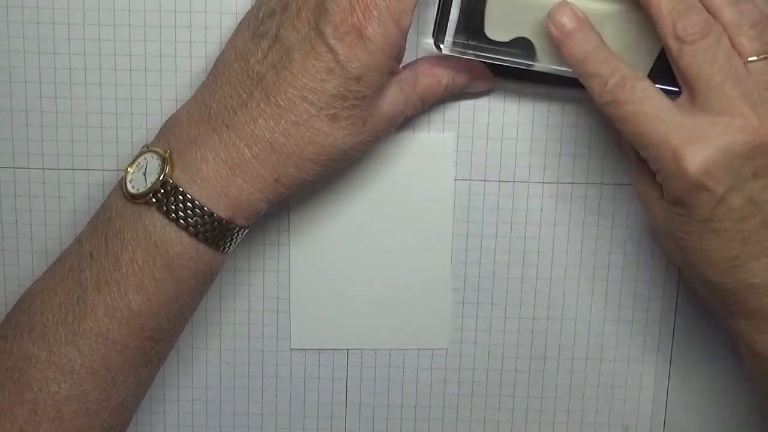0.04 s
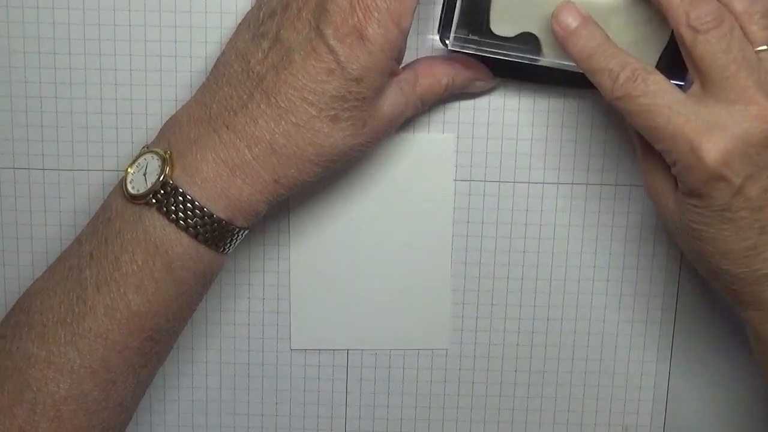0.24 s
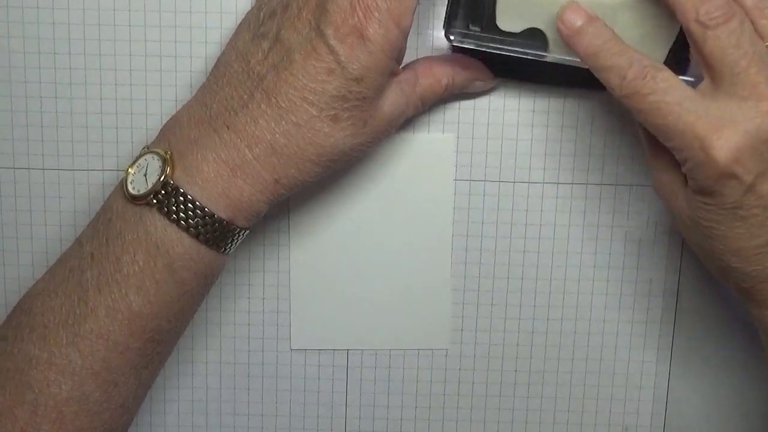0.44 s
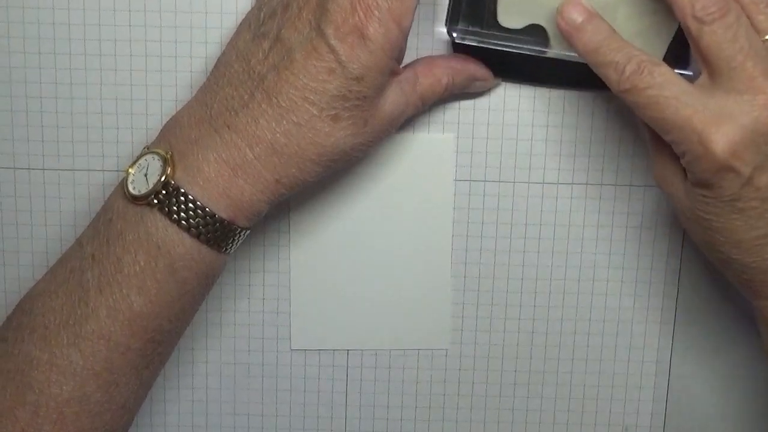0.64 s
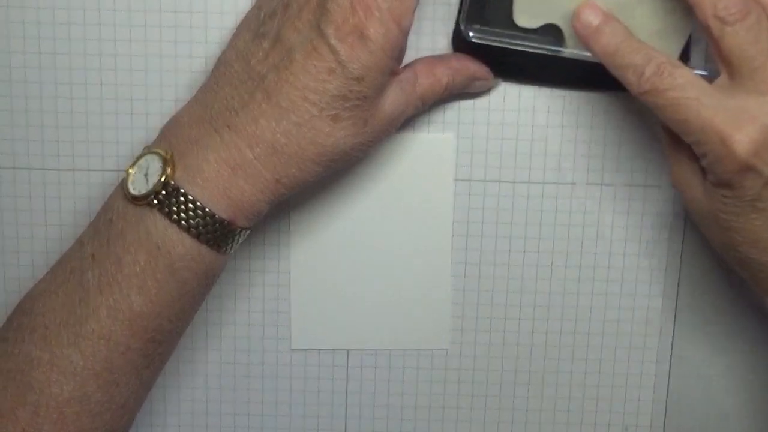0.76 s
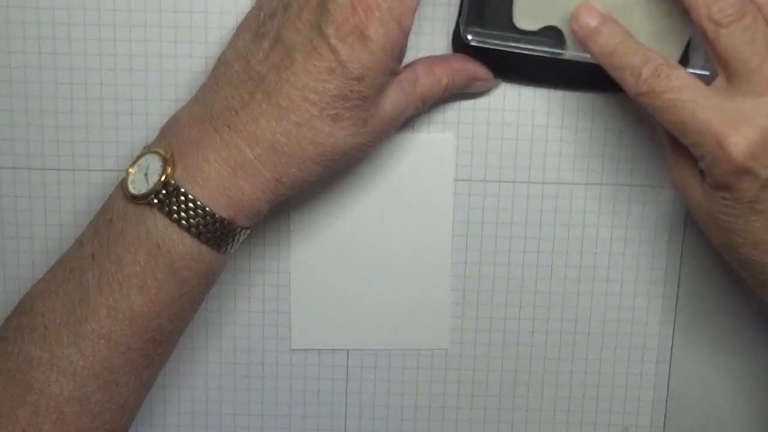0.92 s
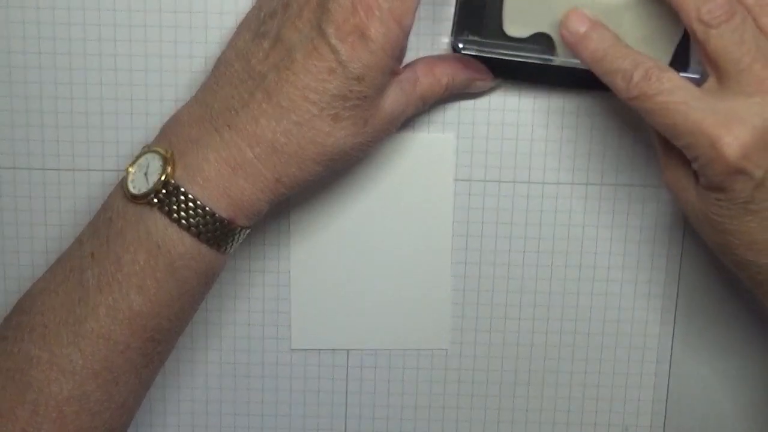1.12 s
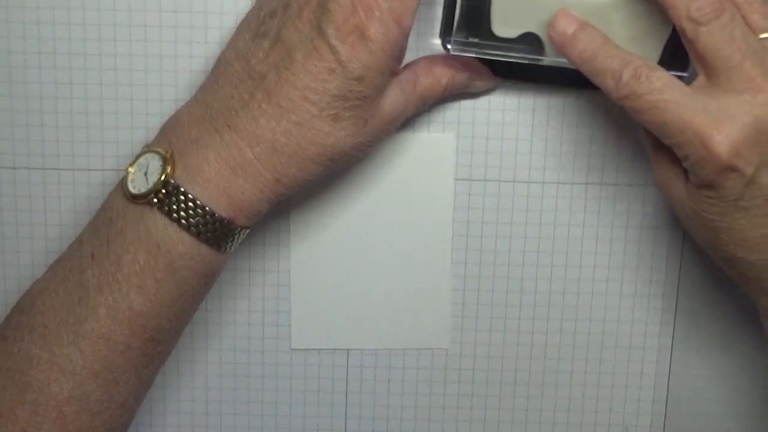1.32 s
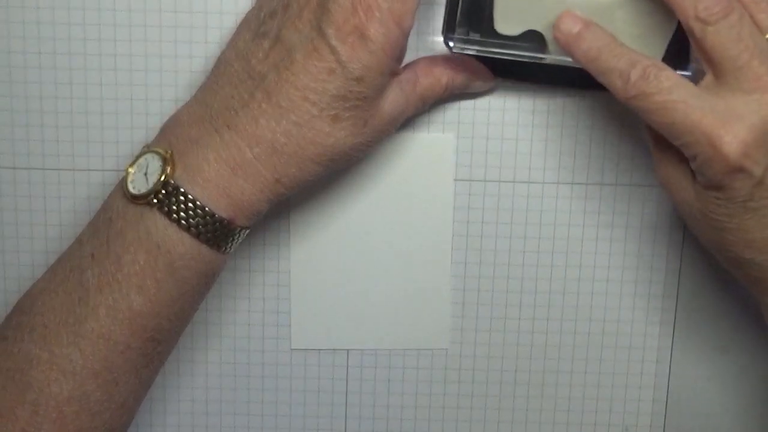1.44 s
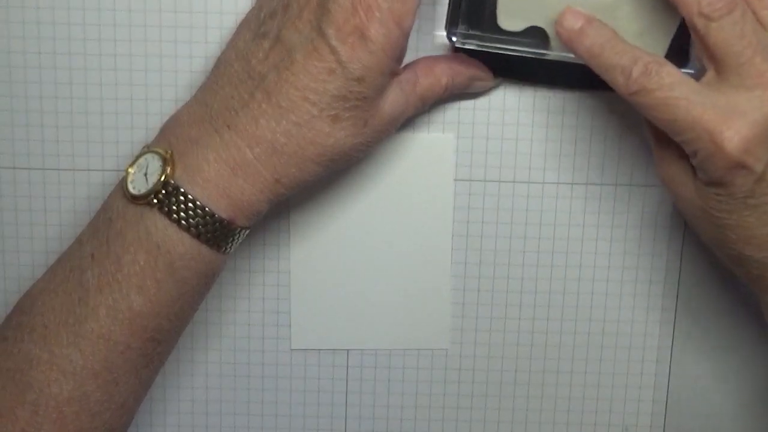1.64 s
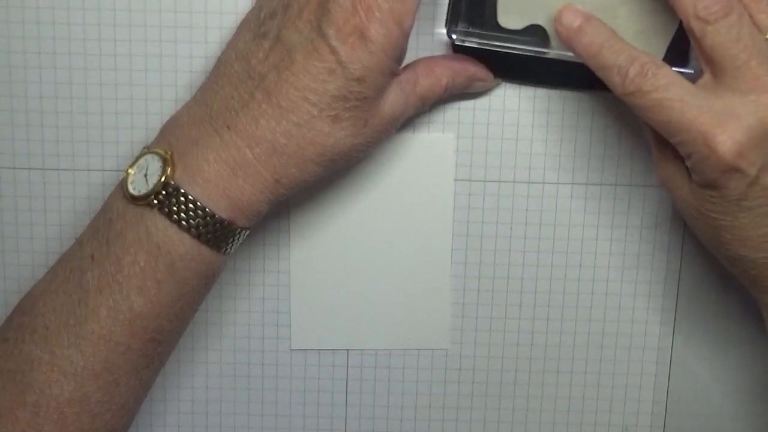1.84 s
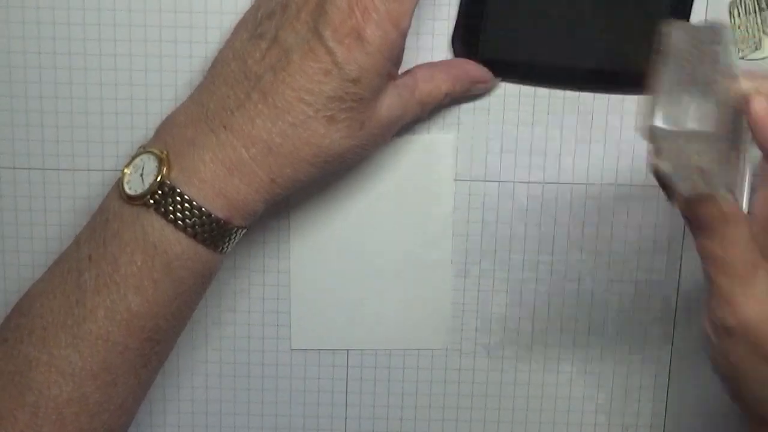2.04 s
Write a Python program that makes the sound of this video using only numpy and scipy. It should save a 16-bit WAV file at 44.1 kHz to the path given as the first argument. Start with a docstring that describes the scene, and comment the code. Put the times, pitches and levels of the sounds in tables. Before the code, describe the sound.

Clear acrylic stamp block tapped on an ink pad, quick dull knocks on a craft table

```python
"""The sound opens partway through a tap: an acrylic stamp block hits an ink pad on a craft table.
More taps follow, about four a second, each a decaying table thud, a ringing knock of the pad's plastic case,
a clack of block modes and noise ticks as one edge lands, then the other. Soft scuffs are swells of noise.
A small room answers with near echoes and a noise tail, over faint hiss, hum, whine and falling chirps."""
import sys
import numpy as np
from scipy import signal
from scipy.fft import rfft, irfft, next_fast_len
from scipy.io import wavfile

SR = 44100
rng = np.random.default_rng(int(sys.argv[2]) if len(sys.argv) > 2 else 0)


def store_wav(level_fs):
    """Save 16-bit WAV to argv[1]."""
    pcm = np.round(np.clip(np.atleast_2d(level_fs), -1, 1) * 32767)
    wavfile.write(sys.argv[1], SR, pcm.T.astype(np.int16))


N = 91463  # samples, about 2.07 s


# The taps. Each row: start in seconds, thud level in dB, case knock level in dB, knock centre in Hz,
# block clack level in dB, clack centre in Hz, first edge tick level in dB,
# delay of the second edge in seconds, second edge level in dB.
TAPS = [(-.0225, -18.5, -26, 427, -31, 1050, -40, 0.0092, -22),
        (0.2862, -26.5, -32.5, 400, -30.5, 1270, -41, 0.0082, -45),
        (0.5392, -24.5, -24.5, 531, -36, 1790, -30, 0.0067, -43),
        (0.807, -23, -25, 598, -32, 1600, -33.5, .0072, -37.5),
        (1.0516, -33.5, -35, 435, -42.5, 1900, -43, 0.0089, -66),
        (1.2865, -23.5, -28.5, 384, -27.5, 1275, -38.5, 0.0054, -39),
        (1.5177, -26.5, -32, 477, -34, 1840, -40.5, 0.0089, -48.5),
        (1.7270, -38.5, -44, 399, -50, 806, -62, 0.015, -66)]
# The block rocks against the rim of the case. Each row: start in seconds, level in dB, clack centre in Hz.
ROCKS = [(0.0221, -37, 1180)]
SECOND_CLACK_DB = -4.5  # clack relative to the tick of the second edge
TICK_T60_S, SECOND_T60_S = 0.014, 0.0077  # decay of the first and second edge ticks


def taps():
    """Every tap lands on one edge of the block and settles on the other."""
    track = np.zeros(N)
    t = np.arange(SR // 2) / SR
    for s, thud_db, knock_db, knock_hz, clack_db, clack_hz, tick_db, gap_s, second_db in TAPS:
        first = amp(thud_db) * thud(t)
        first += amp(knock_db) * knock(t, knock_hz)
        first += amp(clack_db) * clack(t, clack_hz)
        first += amp(tick_db) * tick(t, TICK_T60_S)
        add(track, s, first)
        second = tick(t, SECOND_T60_S) + amp(SECOND_CLACK_DB) * clack(t, clack_hz)
        add(track, s + gap_s, amp(second_db) * second)
    for s, db, hz in ROCKS:
        add(track, s, amp(db) * clack(t, hz))
    return track


# The table's give; the higher the shape, the narrower the swell.
THUD_HZ, THUD_PEAK_S, THUD_SHAPE = 120.5, .009, 1.6
# Rebounds of the table and near walls. Each row: delay in seconds, signed gain.
ECHOES = [(.0121, .43), (.0183, .2), (.0258, -.43), (.0384, -.13), (.05, -.2), (.0646, .08), (.0864, -.12)]
# Low ringing of table and room. Each row: pitch in Hz, level relative to the thud in dB, t60 in seconds.
BOOM = [(44, -31, .5), (66.3, -20, .37), (114, -23, .5), (170, -19, .28), (245, -18, .11), (344, -32, .34)]


def dip(t):
    """The table gives under the cushioned blow: a low swing that swells and dies."""
    u = np.maximum(t, 0) / THUD_PEAK_S
    swell = (u * np.exp(1 - u)) ** THUD_SHAPE
    return -swell * np.cos(2 * np.pi * THUD_HZ * (t - THUD_PEAK_S))


def thud(t):
    """The table dips, rebounds as delayed copies, and booms in low modes."""
    rebounds = sum(gain * dip(t - s) for s, gain in ECHOES)
    boom = ring(BOOM, t, lambda hz: 0) * (1 - np.exp(-t / THUD_PEAK_S))
    return dip(t) + rebounds + boom


# Modes of the pad's plastic case. Each row: pitch in Hz, level in dB before weighting, t60 in seconds.
CASE = [(339.2, -6.5, 0.15), (428, -3, 0.045), (462.3, -8, 0.087), (511.8, -4.5, 0.084),
        (563.2, -14.5, 0.1), (638.7, -5, 0.062), (744, -9, 0.047), (858, -11, 0.09)]
KNOCK_WIDTH_OCT, KNOCK_ATTACK_S, KNOCK_SKIRT_DB = .45, 0.0038, -12
PUSH_DB, PUSH_PEAK_S = -1, .002  # the dead first swings


def knock(t, centre_hz):
    """The case gives a few dead swings and rings briefly."""
    u = t / PUSH_PEAK_S
    push = amp(PUSH_DB) * u * np.exp(1 - u) * np.sin(2 * np.pi * centre_hz * t)
    modes = ring(CASE, t, favour(centre_hz, KNOCK_WIDTH_OCT, KNOCK_SKIRT_DB))
    return -(push + modes * (1 - np.exp(-t / KNOCK_ATTACK_S)))


# Modes of the acrylic block. Each row: pitch in Hz, level in dB before weighting, t60 in seconds.
BLOCK = [(770, -0.5, 0.03), (1187, -6, 0.015), (1320, -10.5, 0.02), (1491, -9.5, 0.014), (1777, -3.5, 0.02),
         (1880, -37.5, 0.044), (2840, -2, 0.0096), (3200, 1, 0.034)]
CLACK_WIDTH_OCT, CLACK_SKIRT_DB = .4, -15


def clack(t, centre_hz):
    """The block's short ring; each mode starts up or down by chance."""
    weight_db = favour(centre_hz, CLACK_WIDTH_OCT, CLACK_SKIRT_DB)
    return sum(rng.choice([-1, 1]) * ring([mode], t, weight_db) for mode in BLOCK)


# Colour of the edge ticks. Each row: frequency in Hz, relative density in dB per Hz.
TICK = [(300, -18), (900, 9.5), (1700, 7), (2300, 1.5), (3000, 6), (3700, 1.5), (4500, 7.5), (6000, -1),
        (8000, -1), (9500, -2.5), (11000, -9.5)]
TICK_ATTACK_S, TICK_HOLD_S = 0.00013, 0.00093


def tick(t, t60):
    """Hard plastic edges meet in a brief noise burst."""
    attack = 1 - np.exp(-t / TICK_ATTACK_S)
    return noise(TICK, len(t)) * attack * fade(t - TICK_HOLD_S, t60)


def favour(centre_hz, width_oct, skirt_db):
    """Where the block lands decides which modes speak: dB as a function of Hz."""
    def weight_db(hz):
        octaves = np.log2(hz / centre_hz)
        return 20 * np.log10(amp(skirt_db) + np.exp(-.5 * (octaves / width_oct) ** 2))
    return weight_db


MODE_SCATTER_DB, DETUNE = 0.43, .006  # chance spread of level, and of pitch as a fraction


def ring(modes, t, weight_db):
    """Damped modes, a little different in strength and pitch at every blow."""
    total = 0
    for hz, db, t60 in modes:
        level = amp(db + weight_db(hz) + MODE_SCATTER_DB * rng.standard_normal())
        pitch = hz * (1 + DETUNE * rng.standard_normal())
        total = total + level * fade(t, t60) * np.sin(2 * np.pi * pitch * t)
    return total


# The block scuffs lightly in the fingers and on the pad.
# Each row: middle in seconds, width (standard deviation) in seconds, peak level in dB.
SCUFFS = [(0.028, 0.021, -56), (.97, 0.037, -72), (1.2, 0.0096, -70), (1.895, 0.016, -67.5)]
# Colour of the scuffs. Each row: frequency in Hz, relative density in dB per Hz.
SCUFF = [(500, 7), (1500, 1.5), (4000, -2), (7000, -7.5), (10000, -11.5)]


def scuffs():
    """Friction as soft swells of coloured noise."""
    t = np.arange(N) / SR
    swells = sum(amp(db) * np.exp(-.5 * ((t - s) / width) ** 2) for s, width, db in SCUFFS)
    return noise(SCUFF, N) * swells


# Decay of the room. Each row: frequency in Hz, t60 in seconds.
ROOM_T60 = [(100, 0.54), (400, 0.2), (1100, 0.21), (3000, 0.19), (9000, 0.093)]
# Strength of the tail. Each row: frequency in Hz, level in dB.
ROOM_LEVEL = [(60, -22), (150, -16.5), (300, 3), (600, -7), (1500, -3.5), (4000, -9), (10000, -4.5)]
# Stereo width of the tail. Each row: frequency in Hz, side over mid in dB.
ROOM_SIDE = [(100, -22), (300, -12), (1000, -7.5), (2500, -4.5), (5000, -2.5), (10000, -4.5)]
ROOM_DELAY_S = 0.0029  # time scale of the tail's soft onset


def room(x):
    """A diffuse tail of shaped noise whose highest treble dies first."""
    hz, t, bands = signal.stft(rng.standard_normal((2, SR // 2)), SR, nperseg=256)
    t60 = along(ROOM_T60, hz)[:, None]
    even_energy = np.sqrt(2 * np.log(1000) / (t60 * SR))  # a longer decay gets no extra energy
    shape = fade(t, t60) * even_energy * amp(along(ROOM_LEVEL, hz))[:, None]
    tail = signal.istft(bands * shape, SR, nperseg=256)[1]
    tail_t = np.arange(tail.shape[1]) / SR
    tail = tail * (1 - np.exp(-(tail_t / ROOM_DELAY_S) ** 2))
    wet = signal.fftconvolve(x[None], tail, axes=1)[:, :N]
    return widen(wet, ROOM_SIDE)


# Colour of the hiss. Each row: frequency in Hz, relative density in dB per Hz.
FLOOR = [(15, -28), (25, 10), (101, 4.5), (391, 1), (456, -0.5), (619, -3.5), (668, -1.5), (721, -2),
         (1760, -7), (2450, -6.5), (6440, -10.5), (9680, -11), (11000, -17), (14300, -98), (22000, -120)]
# Stereo width of the hiss. Each row: frequency in Hz, side over mid in dB.
FLOOR_SIDE = [(50, -16), (300, -3.5), (1000, 2), (3000, -3.5), (10000, -8.5)]
# Steady hum and whine. Each row: pitch in Hz, level in dB.
HUM = [(102.3, -72), (7806, -86)]
FLOOR_DB = -64.5  # rms of the hiss's mid signal


def background():
    """Wide coloured hiss, steady sine hum and whine, and faint chirping."""
    t = np.arange(N) / SR
    hiss = widen([noise(FLOOR, N), noise(FLOOR, N)], FLOOR_SIDE)
    hum = sum(amp(db) * np.sin(2 * np.pi * hz * t) for hz, db in HUM)
    return amp(FLOOR_DB) * hiss + hum + chirps()


# Faint chirps. Each row: first in seconds, period in seconds, pitch at the middle in Hz, mean level in dB.
CHIRPS = [(0, .04, 2430, -70), (.075, .08, 3280, -73)]
CHIRP_WIDTH_S, CHIRP_FALL_HZ_PER_S, CHIRP_SCATTER_DB = 0.0067, 14000, 3


def chirps():
    """Tiny sine swells of falling pitch repeat at a steady rate."""
    track = np.zeros(N)
    t = np.arange(-SR // 50, SR // 50) / SR  # zero at the middle of the chirp
    swell = np.exp(-.5 * (t / CHIRP_WIDTH_S) ** 2)
    for first_s, period_s, hz, db in CHIRPS:
        for s in np.arange(first_s, N / SR, period_s):
            cycles = hz * t - CHIRP_FALL_HZ_PER_S * t ** 2 / 2 + rng.random()
            size = amp(db + CHIRP_SCATTER_DB * rng.standard_normal())
            add(track, s + t[0], size * swell * np.sin(2 * np.pi * cycles))
    return track


def amp(db):
    """Decibels to gain."""
    return 10 ** (np.asarray(db) / 20)


def unit(x):
    """Scale to rms 1."""
    return x / np.sqrt(np.mean(x ** 2) + 1e-20)


def along(points, hz):
    """Read (Hz, value) points on a log frequency axis."""
    f, v = np.transpose(points)
    return np.interp(np.log(hz + 1), np.log(f + 1), v)


def filtered(x, response):
    """Shape x by a gain given as a function of frequency."""
    n = x.shape[-1]
    m = next_fast_len(n + SR // 4)  # padded against wrap-around
    return irfft(rfft(x, m) * response(np.fft.rfftfreq(m, 1 / SR)), m)[..., :n]


def noise(spectrum, n):
    """Coloured noise of rms 1."""
    return unit(filtered(rng.standard_normal(n), lambda hz: amp(along(spectrum, hz))))


def fade(t, t60):
    """Exponential decay by 60 dB in t60 seconds, held at full level before time zero."""
    return np.exp(-np.log(1000) * np.maximum(t, 0) / t60)


def add(track, s, sound):
    """Mix a sound in at time s, trimming what falls outside the track."""
    i = round(s * SR)
    part = sound[max(-i, 0):len(track) - i]
    track[max(i, 0):][:len(part)] += part


def widen(pair, side_db):
    """Two unrelated signals become left and right, as mid and side."""
    side = filtered(pair[1], lambda hz: amp(along(side_db, hz)))
    return np.array([pair[0] + side, pair[0] - side])


def scene():
    """Central taps and scuffs, the wide room around them and the background."""
    dry = taps() + scuffs()
    return dry + room(dry) + background()


TOP_HZ = 11150  # upper band limit


def record(dry):
    """A very steep low-pass removes the top of the treble."""
    return filtered(dry, lambda hz: 1 / np.sqrt(1 + (hz / TOP_HZ) ** 150))


dry = scene()
out = record(dry)
store_wav(out)
```